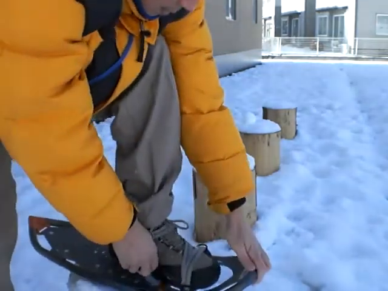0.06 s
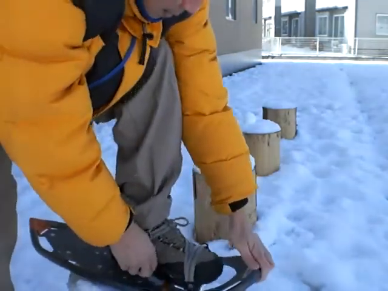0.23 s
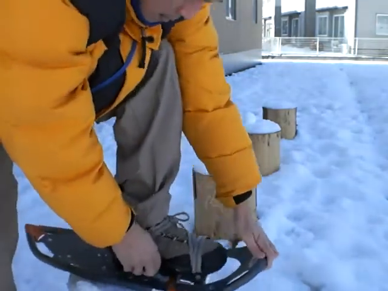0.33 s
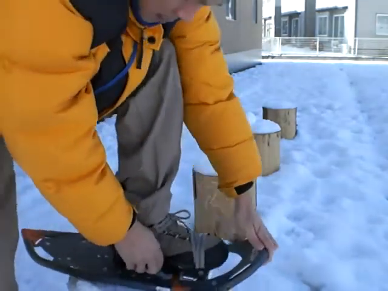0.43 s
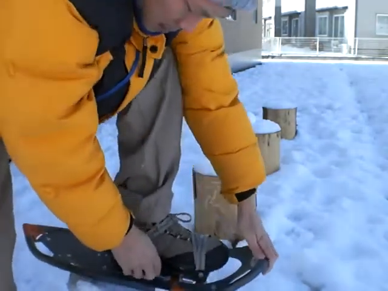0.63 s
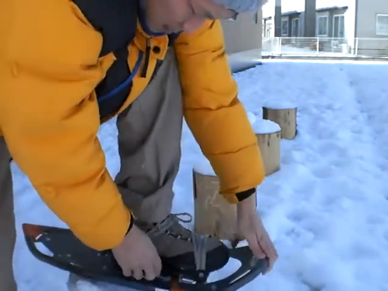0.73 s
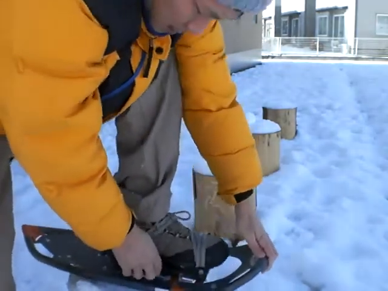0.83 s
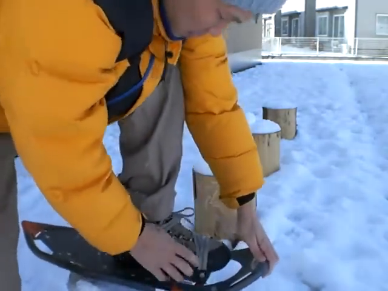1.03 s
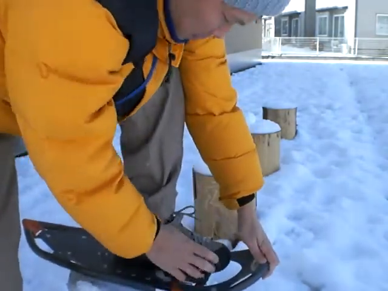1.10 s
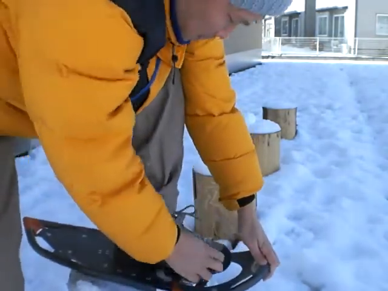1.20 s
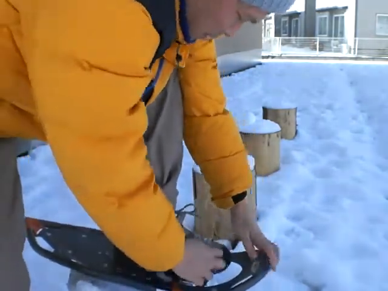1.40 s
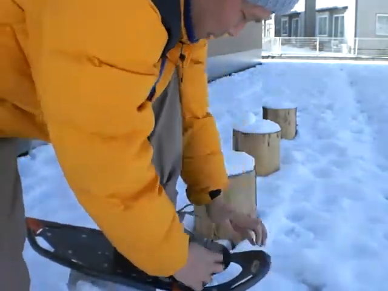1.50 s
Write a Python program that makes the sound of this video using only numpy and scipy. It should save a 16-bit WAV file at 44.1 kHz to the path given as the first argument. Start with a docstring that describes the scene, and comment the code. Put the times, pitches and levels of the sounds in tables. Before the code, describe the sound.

Sharp plastic clicks and snaps of a snowshoe strap being fastened, with faint jacket rustle.

```python
"""A strap scrapes through its buckle, which snaps shut: a snowshoe binding tightened by hand, close to
a small microphone in a snowy yard. The pawl clicks over the strap's teeth and the plastic deck takes
a dull knock. Jacket sleeves rustle, a nearby house wall answers each click, and far off a machine
whines over the hum of the town."""
import sys
import numpy as np
from scipy import signal
from scipy.fft import rfft, irfft, next_fast_len
from scipy.io import wavfile
from scipy.ndimage import map_coordinates

SR = 44100
rng = np.random.default_rng(int(sys.argv[2]) if len(sys.argv) > 2 else 0)


def log_audio(samples):
    """Write samples as a 16-bit WAV file to the path given in sys.argv[1]."""
    # one column per channel
    frames = np.atleast_2d(samples).T
    # limit to full scale, then quantise
    limited = np.clip(frames, -1, 1)
    pcm = np.round(limited * 32767).astype(np.int16)
    wavfile.write(sys.argv[1], SR, pcm)


N = 68355


# resonances of the buckle: pitch_hz, level_db, t60_s
BUCKLE_MODES = [(685, -31, 0.0092), (1100, -14.5, 0.015), (1600, -49, 0.011), (2413, -10.5, 0.0097),
                (2535, -18.5, 0.013), (3585, -8.5, 0.011), (3737, -11, 0.0097), (4630, -19, 0.013),
                (5840, -16.5, .010), (6100, -15, 0.01), (6720, -15.5, 0.011), (7750, -15, .011),
                (8300, -22.5, 0.012), (9400, -22, 0.011)]

def buckle():
    """Close up, the buckle snaps shut and rings briefly."""
    return hit(0.3009, BUCKLE_MODES, attack_s=0.00089, crack_db=-14, crack_t60_s=0.012)


# resonances of pawl and strap: pitch_hz, level_db, t60_s
PAWL_MODES = [(1800, -36, 0.028), (2560, -25, 0.005), (2860, -18.5, 0.007), (3570, -15.5, 0.0064),
              (3812, -24.5, 0.013), (4050, -41, 0.033), (5520, -20.5, 0.0058), (6350, -24, 0.0067),
              (7300, -28.5, 0.007), (8280, -30, 0.0055), (9840, -32, 0.004), (10360, -24.5, 0.0043),
              (10920, -27, .005)]
# one click per tooth: start_s, level_db, treble_tilt
PAWL_CLICKS = [(.3428, -3, -5), (0.3646, -10.5, -15), (.4708, -14.5, -10), (.8114, 1.5, 0.5),
               (.8470, -5, 1), (0.86, -3, 3), (1.2700, -27, 7), (1.2781, -17.5, 5)]

def pawl():
    """The pawl drops over single teeth of the strap, some clicks brighter than others."""
    return sum(amp(db) * hit(s, PAWL_MODES, attack_s=0.00046, crack_db=-23.5, crack_t60_s=0.0085,
                             treble_tilt=tilt) for s, db, tilt in PAWL_CLICKS)


# resonances of the knocked deck: pitch_hz, level_db, t60_s
DECK_MODES = [(468, -27.5, 0.015), (720, -20.5, 0.01), (935, -19.5, 0.0082), (1143, -18, 0.0089),
              (1520, -21.5, 0.0075), (1780, -24.5, 0.0093), (2270, -30.5, 0.012), (3600, -33, 0.0055),
              (5000, -32, 0.0062)]

def deck():
    """A dull knock sets the plastic deck ringing, neighbouring modes in opposite phase."""
    return amp(2) * hit(0.5511, DECK_MODES, attack_s=0.00026, crack_db=-32.5, crack_t60_s=0.014,
                        polarity=-1.005)


# spectrum of the contact noise: frequency_hz, gain_db
CRACK_SPECTRUM = [(300, -11.5), (1000, 5), (3500, -2.5), (7000, -4.5), (11000, -7.5)]

def hit(start_s, modes, attack_s, crack_db, crack_t60_s, treble_tilt=0, polarity=1):
    """One contact on plastic: damped modes and a short crack of noise."""
    t = np.arange(SR // 10) / SR
    ring = sum(polarity ** k * amp(db - 60 * t / t60) * np.sin(2 * np.pi * hz * t)
               for k, (hz, db, t60) in enumerate(modes))
    noise = unit(coloured(rng.standard_normal(len(t)), CRACK_SPECTRUM))
    crack = amp(crack_db - 60 * t / crack_t60_s) * noise
    blow = (ring + crack) * (1 - np.exp(-t / attack_s))
    blow = signal.sosfilt(signal.butter(2, 230, "highpass", fs=SR, output="sos"), blow)
    blow = coloured(blow, [(1800, -0.6 * treble_tilt), (3800, 0), (11000, 1.9 * treble_tilt)])
    return np.pad(blow, (round(start_s * SR), N))[:N]


# the strap's pull through the buckle: time_s, level_db
STRAP_PULL = [(.222, -58), (.235, -44.5), (.243, -57), (.249, -30), (.254, -24.5), (.260, -24), (.271, -35),
              (.284, -36.5), (.299, -40), (.325, -45), (.38, -62.5)]
# spectrum of the scrape: frequency_hz, gain_db
SCRAPE_SPECTRUM = [(80, -12), (200, -9.5), (330, -4), (1000, -2), (1700, -2.5), (2600, -0.5), (4000, -5),
                   (4800, -10), (7500, -10.5), (10000, -14.5), (12000, -17)]
# resonances of the deck under the strap: pitch_hz, width_hz, gain_db
DECK_RINGS = [(400.6, 54, 2), (510, 27, 2.5), (557, 40, 1), (785, 81, 4), (1200, 134, -5), (1436, 31, 2.5),
              (2000, 110, -12), (2360, 37, -0.5), (2880, 28, -12), (3790, 90, -12)]

def strap(slips_per_s=4000):
    """The strap scrapes through the buckle in dense small slips, which also set the deck ringing."""
    def deck_response(f):
        return sum((-1) ** k * amp(db) * 1j * f * width / (hz * hz - f * f + 1j * f * width)
                   for k, (hz, width, db) in enumerate(DECK_RINGS))

    pull_db, = curves(STRAP_PULL)
    slips = unit((rng.random(N) < slips_per_s / SR) * rng.uniform(-1.25, 1, N))
    scrape = unit(coloured(slips, SCRAPE_SPECTRUM))
    ring = unit(filtered(slips, deck_response))
    return amp(pull_db) * unit(scrape + ring)


# soft low thuds: centre_s, pitch_hz, level_db, half_length_s
SHOE_THUDS = [(.14, 36.2, -42.5, 0.02), (.315, 150, -48, 0.009), (.575, 113, -52, 0.027),
              (1.295, 322, -52, 0.017), (1.30, 36, -49.5, .04)]

def thuds():
    """The snowshoe shifts with soft thuds, each a low swell of a few cycles."""
    t = np.arange(N) / SR
    return sum(amp(db) * swell(s, half_s) * np.sin(2 * np.pi * hz * (t - s))
               for s, hz, db, half_s in SHOE_THUDS)


# rustle of the sleeves: time_s, level_db
SLEEVE_RUB = [(0, -59), (.05, -52.5), (.12, -65), (.18, -62.5), (.24, -45.5), (.38, -50.5), (.43, -48.5),
              (.52, -45), (.58, -48.5), (.68, -61.5), (.78, -59), (.92, -60.5), (1.03, -54.5), (1.12, -60),
              (1.24, -58), (1.33, -63.5), (1.41, -57), (1.50, -57.5), (1.55, -50)]
# spectrum of rubbing nylon: frequency_hz, gain_db
NYLON_SPECTRUM = [(300, -8), (1200, -2), (2000, 6), (3000, 0), (5000, -0.5), (7000, -3.5), (9500, -3),
                  (11000, -10)]
# quick swishes: centre_s, half_length_s, centre_hz, level_db
NYLON_SWISHES = [(1.003, 0.0041, 2750, -54), (1.388, 0.0065, 3540, -53.5), (1.401, 0.011, 8600, -50),
                 (1.545, .005, 3900, -53.5)]

def sleeves(half_width_octaves=0.56):
    """Nylon rubs on nylon: a fine hiss with small crinkles and a few quick swishes."""
    rub_db, = curves(SLEEVE_RUB)
    rub = rng.standard_normal(N) + amp(-4.5) * grains(per_s=900, spread_db=4)
    rustle = amp(rub_db + 1.04 * wobble(59.04)) * unit(coloured(rub, NYLON_SPECTRUM))
    for s, half_s, hz, db in NYLON_SWISHES:
        band = filtered(rng.standard_normal(N),
                        lambda f: 1 / (1 + (np.log2((f + 1) / hz) / half_width_octaves) ** 2))
        rustle += amp(db) * swell(s, half_s) * unit(band)
    return rustle


# echoes off walls a few metres away: delay_s, gain_db
WALL_ECHOES = [(0.0134, -21), (0.0167, -27.5)]

def yard(x, scatter_t60_s=0.037, scatter_db=-31):
    """Nearby walls answer, with a faint, short scatter over the snow."""
    t = np.arange(SR // 5) / SR
    tail = rng.standard_normal(len(t)) * amp(-60 * t / scatter_t60_s)
    scatter = signal.fftconvolve(x, tail / np.linalg.norm(tail))[:N]
    echoes = filtered(x, lambda f: sum(amp(db) * np.exp(-2j * np.pi * f * s) for s, db in WALL_ECHOES))
    return x + echoes + amp(scatter_db) * scatter


# course of the machine's whine: time_s, pitch_hz, level_db
MACHINE_WHINE = [(0, 769, -54.5), (.13, 781.6, -58), (.35, 776, -55.5), (.51, 772.8, -45.5),
                 (.585, 775, -70), (.63, 774, -53), (.76, 775, -46.5), (.82, 777, -58.5), (.87, 778, -47),
                 (.92, 771.7, -54), (.965, 777.4, -44.5), (1.02, 783, -55.5), (1.2, 776, -51.5),
                 (1.33, 789, -48), (1.425, 779, -49.5), (1.53, 796, -44.5)]

def machine():
    """A distant machine whines, wavering in level and pitch."""
    hz, db = curves(MACHINE_WHINE)
    return amp(db + 2.2 * wobble(29.94)) * tone(hz + 3.62 * wobble(35.9))


# spectrum of the town's rumble: frequency_hz, gain_db
TOWN_SPECTRUM = [(20, 1), (35, 4), (50, 3), (70, 4.5), (100, -3.5), (170, -4), (300, -3), (500, -2),
                 (720, 3), (900, -5.5), (1300, -12.5), (2500, -25.5), (5000, -26), (10000, -28.5)]

def town(hum_hz=70.5, hum_db=-60.5, rumble_db=-49.5):
    """Far beyond the yard, the town rumbles with a low, unsteady hum."""
    hum = amp(hum_db + 4.4 * wobble(6.9)) * tone(hum_hz + 1.7 * wobble(8.7))
    rumble = amp(rumble_db) * unit(coloured(rng.standard_normal(N), TOWN_SPECTRUM))
    return hum + rumble


def amp(db):
    """Decibels to gain."""
    return 10 ** (np.asarray(db) / 20)


def unit(x):
    """Scale to rms 1."""
    return x / np.sqrt(np.mean(x ** 2) + 1e-20)


def tone(hz):
    """A sine of rms 1 that follows a pitch curve."""
    return np.sqrt(2) * np.sin(2 * np.pi * np.cumsum(hz) / SR)


def swell(centre_s, half_length_s):
    """A bell-shaped rise and fall."""
    return np.exp(-((np.arange(N) / SR - centre_s) / half_length_s) ** 2)


def curves(rows):
    """One value per sample for each column after the time."""
    times, *columns = np.transpose(rows)
    return [np.interp(np.arange(N) / SR, times, column) for column in columns]


def wobble(knots_per_s):
    """A smooth random curve."""
    knots = rng.standard_normal(int(N * knots_per_s / SR) + 4)
    return map_coordinates(knots, [np.arange(N) * knots_per_s / SR])


def grains(per_s, spread_db):
    """Tiny slips at random moments and of uneven size, rms 1."""
    slips = (rng.random(N) < per_s / SR) * rng.standard_normal(N)
    return unit(slips * amp(spread_db * rng.standard_normal(N)))


def filtered(x, response):
    """x through a filter given as a function of frequency."""
    size = next_fast_len(len(x) + SR // 10)
    return irfft(rfft(x, size) * response(np.fft.rfftfreq(size, 1 / SR)), size)[:len(x)]


def coloured(x, points):
    """x through a causal filter given by (frequency_hz, gain_db) points on a log axis."""
    hz, db = np.transpose(points)
    size = 2 * next_fast_len(len(x))
    f = np.fft.rfftfreq(size, 1 / SR)
    gain = amp(np.interp(np.log(f + 1), np.log(hz + 1), db))
    cepstrum = irfft(np.log(gain))
    cepstrum[1:size // 2] *= 2  # fold to minimum phase
    cepstrum[size // 2 + 1:] = 0
    return irfft(rfft(x, size) * np.exp(rfft(cepstrum)))[:len(x)]


def scene():
    """Binding and sleeves close by, the yard around them, machine and town in the distance."""
    binding = buckle() + pawl() + deck() + strap()
    return (yard(binding) + thuds() + sleeves() + machine() + town())[None]


# response of the microphone: frequency_hz, gain_db
MIC_RESPONSE = [(20, -1), (7750, 0.5), (8000, -9.5), (8250, 1), (10500, 0), (11300, -7), (12000, -18.5),
                (12400, -31)]
TOP_HZ = 12365

def record(dry):
    """One small microphone with a narrow notch at 8 kHz and a steep band limit."""
    return filtered(coloured(dry[0], MIC_RESPONSE), lambda f: f < TOP_HZ)[None]


dry = scene()
out = record(dry)
log_audio(out)
```